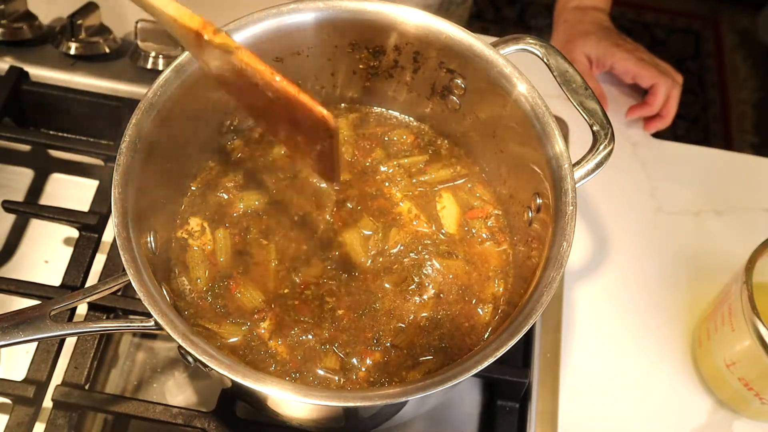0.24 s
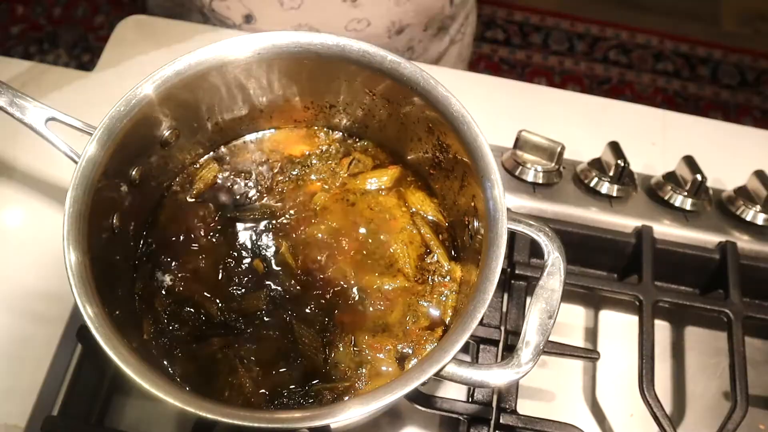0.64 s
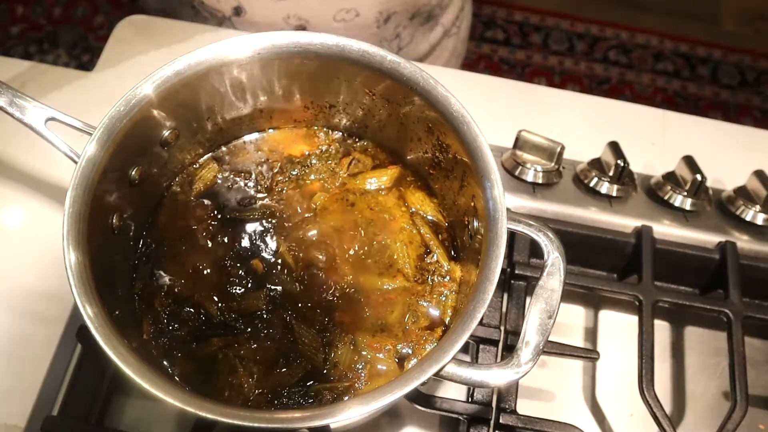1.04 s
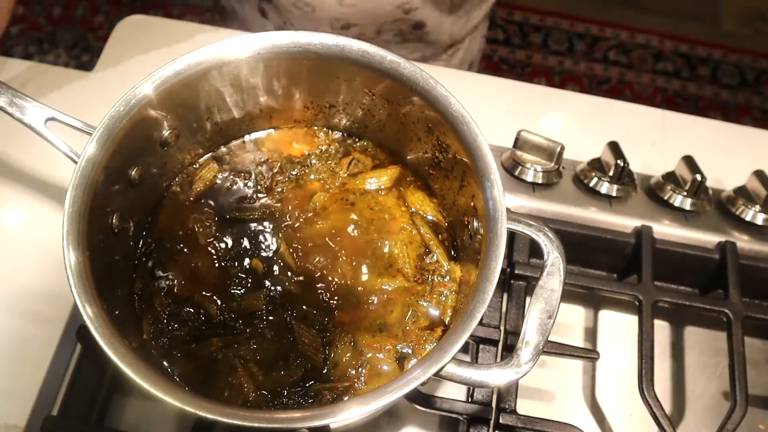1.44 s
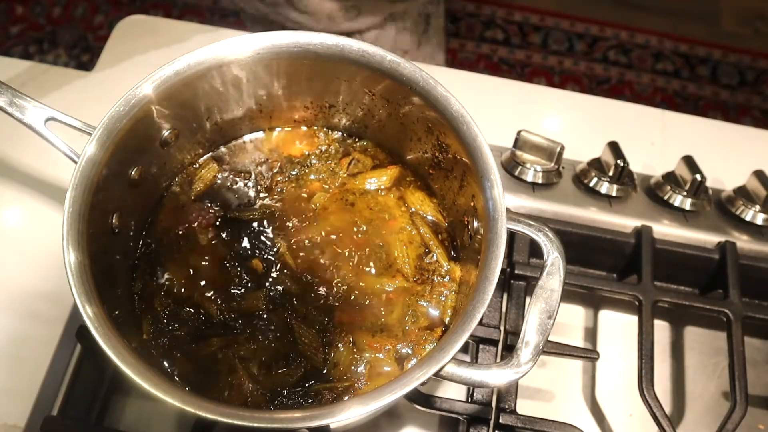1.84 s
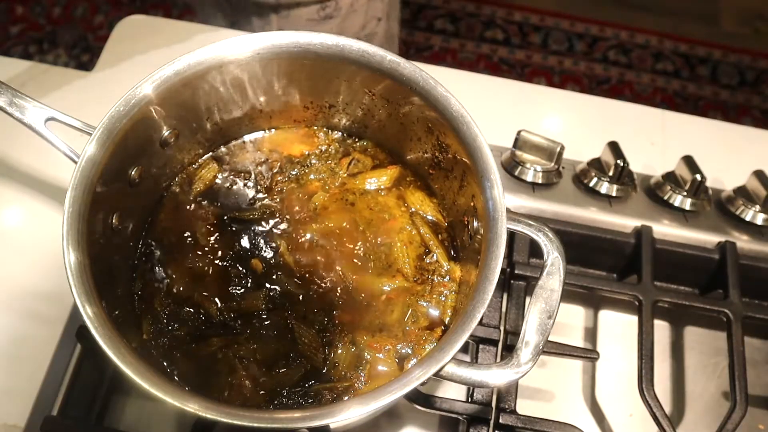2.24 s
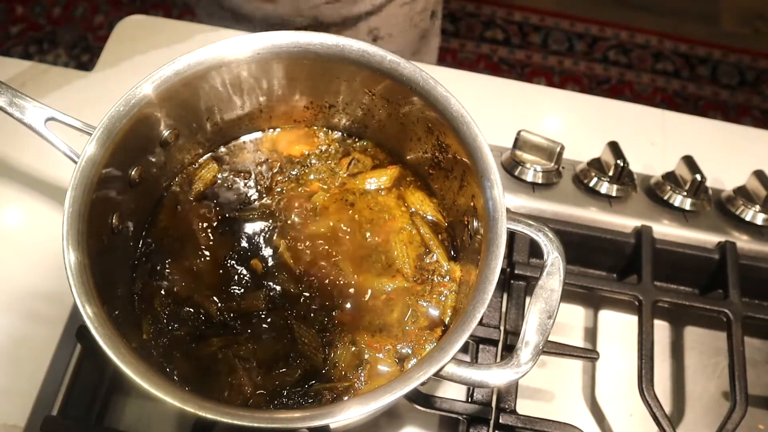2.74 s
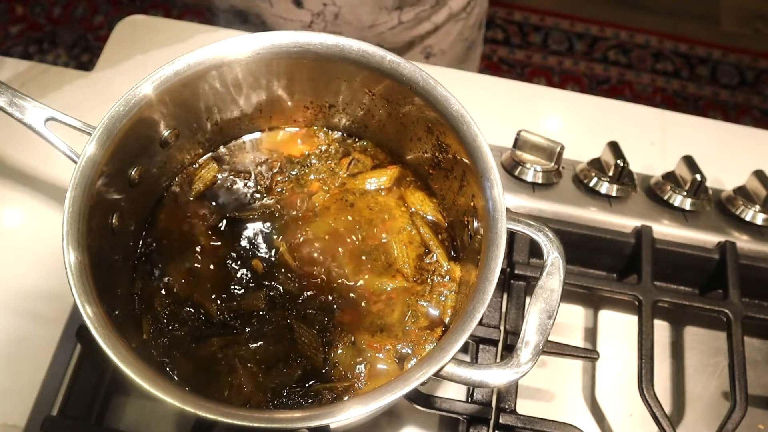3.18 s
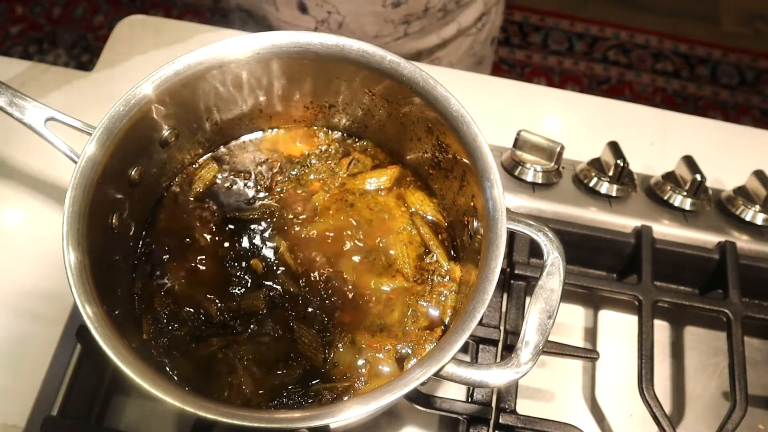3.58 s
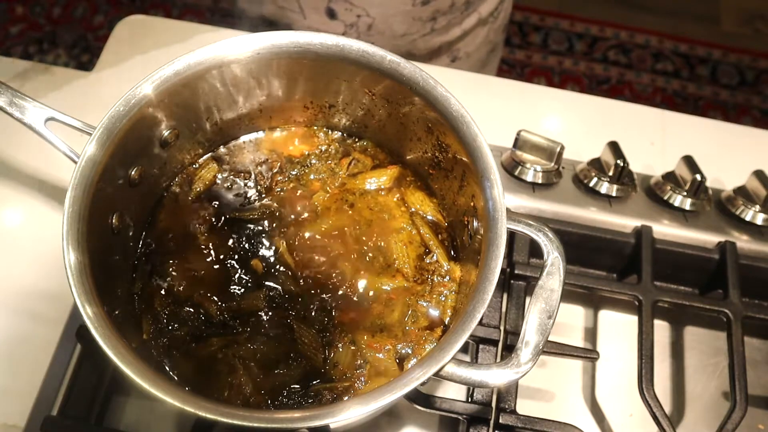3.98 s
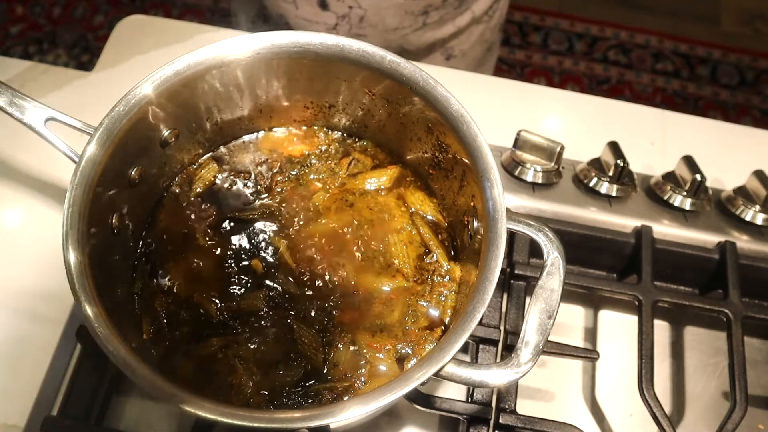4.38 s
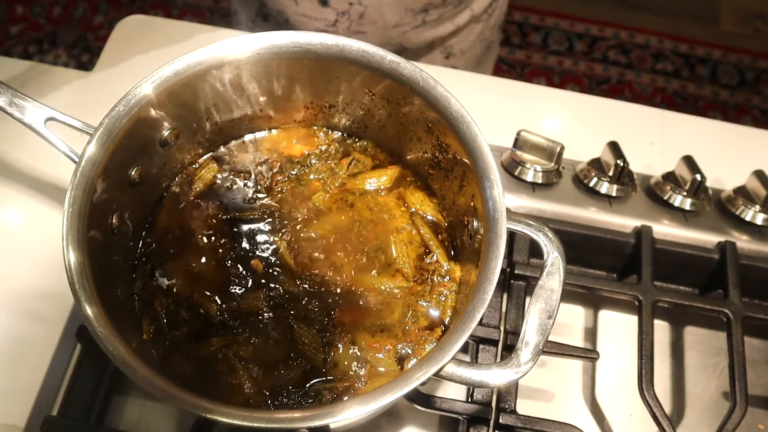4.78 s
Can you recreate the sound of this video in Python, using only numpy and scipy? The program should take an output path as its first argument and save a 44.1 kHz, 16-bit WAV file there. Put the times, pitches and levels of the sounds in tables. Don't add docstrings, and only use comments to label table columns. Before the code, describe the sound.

Quiet kitchen hush cuts to close, dense stew blips and pops in a steel pot, with wooden knocks, brief rubs and one dish set down.

```python
import sys
import numpy as np
from scipy import signal
from scipy.fft import rfft, irfft, next_fast_len
from scipy.io import wavfile
from scipy.ndimage import uniform_filter1d, map_coordinates

SR = 44100
rng = np.random.default_rng(int(sys.argv[2]) if len(sys.argv) > 2 else 0)


def ratio_of_db(decibels):
    return 10 ** (np.asarray(decibels, float) / 20)


def pcm_store(signal):
    levels = np.round(np.clip(np.atleast_2d(signal), -1, 1) * 32767)
    wavfile.write(sys.argv[1], SR, levels.astype(np.int16).T)


N = 221249

# frequency in Hz, density in dB per Hz.
FAR_HUSH = [(12, -44), (20, -26), (98, -3.5), (209, -18), (292, -12.5), (326, -13.5), (375, -16),
            (539, -19.5), (1350, -27), (2120, -29), (2650, -30), (15800, -37)]
# frequency in Hz, density in dB per Hz.
NEAR_HUSH = [(12, -46), (20, -24), (44, -6), (123, 2), (233, -0.5), (375, -9.5), (482, -6), (637, -0.5),
             (775, -13), (1280, -10), (1560, -16.5), (7860, -22.5), (15800, -26.5)]
HUSH_LEVELS_DB = [-49, -49]
# frequency in Hz, correlation from 0 to 1.
STEREO_LIKENESS = [(60, 0.89), (130, 0.86), (290, 0.45), (640, 0.29), (3000, 0.21), (9000, 0.3),
                   (15000, 0.42)]
# frequency in Hz, t60 in seconds.
KITCHEN_T60 = [(300, 0.42), (2000, 0.47), (5000, 0.32), (10000, 0.24), (16000, 0.041)]
# frequency in Hz, left over right in dB.
PORT_DIFFERENCE = [(125, -4), (500, 4.5), (4000, 2), (8000, 3.5), (13000, -1.5)]
# frequency in Hz, width in Hz, level in dB.
JINGLE_MODES = [(4500, 90, -2), (6050, 160, 2), (8000, 300, -3)]
# start in seconds, end in seconds, level in dB.
STROKES = [
    (1.24, 1.314, -43),
    (1.394, 1.535, -49.5),
    (1.72, 1.897, -46.5),
    (2.966, 3.08, -43),
    (3.066, 3.274, -55.5),
]
# frequency in Hz, density in dB per Hz.
FRICTION_COLOUR = [(900, -13), (2000, -6), (5000, -5), (8000, -11.5), (13000, -21)]
# start in seconds, peak in dB, t60 in seconds.
DISH_IMPACTS = [
    (1.2007, -36, 0.042),
    (1.2032, -7.5, 0.017),
    (1.2052, -9, 0.039),
    (1.3336, -17, 0.03),
]
# frequency in Hz, density in dB per Hz.
DISH_COLOUR = [(400, -34), (650, -15), (1500, -10), (2150, -8), (2700, -14), (3300, -1), (4100, -3),
               (4500, -10), (5600, -4), (6750, -1), (7300, -10), (9600, -13), (12000, -18), (16000, -26)]
# start in seconds, peak in dB, low, middle and high tilt in dB.
WOOD_KNOCKS = [
    (.7132, -17.5, 13.5, -2.5, -4.5),
    (3.3402, -15.5, -1, -1.5, -4),
    (4.2975, -17, -9, -1.5, -4.5),
    (4.2995, -19.5, 9, 5, -16),
]
# frequency in Hz, width in Hz, level in dB.
WOOD_MODES = [(2080, 450, -10), (3050, 520, 0), (5200, 620, -2), (6500, 900, -14), (8800, 1500, -13),
              (12000, 3000, -17)]
# start in seconds, peak in dB, low, middle and high tilt in dB.
STIFF_SNAPS = [
    (.851, -26.5, -2, -5.5, -15),
    (1.3525, -19.5, 0, -1, -18),
    (2.9825, -26, 0, 6, -6),
    (4.9258, -23.5, 5, 1.5, -8.5),
]
# start in seconds, lower mode in dB, upper mode in dB.
GRATE_HEAVES = [(0.809, -47.5, -57.5), (.908, -54, -67), (1.121, -49.5, -60), (1.267, -46.5, -69),
                (1.366, -48.5, -55.5), (1.565, -47.5, -60), (1.741, -63, -50.5), (1.85, -51, -56),
                (1.9, -45.5, -53.5), (2.071, -49, -53), (2.186, -48, -53), (2.41, -60, -52),
                (2.454, -47.5, -47), (2.541, -50.5, -56), (2.615, -48.5, -54.5), (2.699, -49.5, -55),
                (2.819, -53, -53.5), (2.959, -52, -51), (3.036, -52.5, -50), (3.22, -42.5, -54.5),
                (3.338, -75, -71), (3.413, -42, -46), (3.55, -51, -54), (3.61, -51, -59),
                (3.773, -45.5, -49.5), (3.814, -55, -52.5), (4.03, -56, -54), (4.339, -43.5, -61),
                (4.625, -54, -46.5), (4.801, -45.5, -48.5)]
# start in seconds, peak in dB, pitch in Hz.
CLEAR_DROPLETS = [(.697, -42, 7200), (0.884, -46.5, 4820), (0.9266, -43.5, 8200), (.967, -44, 5800),
                  (1.098, -46.5, 7100), (1.4964, -42, 7000), (1.5858, -45.5, 8100), (1.716, -49, 5170),
                  (1.926, -45, 6100), (2.1286, -47, 5920), (2.323, -44, 6060), (2.524, -39, 9400),
                  (2.567, -49, 4500), (2.8593, -48, 6940), (2.92, -49.5, 3720), (3.053, -44, 8500),
                  (3.201, -47, 7340), (3.446, -46.5, 8100), (3.512, -45, 2240), (3.532, -44, 3550),
                  (3.7547, -44.5, 6900), (3.8606, -47.5, 7800), (3.934, -46.5, 5300), (4.0335, -46.5, 5340),
                  (4.2, -44, 7700), (4.501, -41, 5540), (4.743, -48, 6420), (4.7626, -46, 5500),
                  (4.8172, -40, 2150), (4.952, -42.5, 6540)]
# start in seconds, peak in dB, pitch in Hz, splash in dB.
BIG_POCKETS = [(.953, -31, 507, -13), (1.108, -31, 586, -19), (1.215, -34.5, 594, -3),
               (1.261, -35.5, 630, -8), (1.745, -33, 528, -2.5), (1.874, -34, 670, -1),
               (1.886, -26.5, 830, -11), (2.046, -28, 610, -7.5), (2.088, -35, 657, -5),
               (2.104, -31.5, 580, -31), (2.175, -33.5, 560, -35), (2.264, -34, 656, -21),
               (2.428, -26, 636, -11.5), (2.443, -36, 670, 1), (2.831, -32.5, 632, 0),
               (2.969, -33, 657, -15), (3.211, -21, 590, -15), (3.417, -23, 610, -17),
               (3.697, -35, 605, 1.5), (3.78, -24, 592, -20), (3.98, -34, 620, -16), (3.994, -30, 517, -9),
               (4.323, -19.5, 692, -11), (4.489, -31.5, 510, -25), (4.617, -31.5, 614, -12),
               (4.779, -37.5, 484, -3), (4.7955, -39, 590, 2), (4.801, -26, 616, -5.5),
               (4.95, -33, 646, -26), (5.0, -33.5, 493, -43)]
# start in seconds, peak in dB, pitch in Hz.
MIDDLING_POCKETS = [(.747, -39, 555), (.792, -41, 620), (.811, -36, 636), (1.028, -39, 600),
                    (1.093, -37, 697), (1.329, -40, 600), (1.441, -40, 698), (1.533, -42.5, 666),
                    (1.769, -35.5, 610), (1.839, -38.5, 610), (2.034, -38, 620), (2.511, -40, 620),
                    (2.601, -37.5, 588), (2.684, -41, 540), (2.76, -47, 640), (2.799, -43, 600),
                    (2.952, -37, 700), (2.999, -36, 660), (3.067, -38.5, 550), (3.115, -42.5, 580),
                    (3.32, -43, 596), (3.539, -37.5, 610), (3.563, -39.5, 494), (3.856, -36.5, 600),
                    (3.868, -41, 494), (4.077, -44, 550), (4.293, -38, 643), (4.604, -42, 485),
                    (4.676, -39, 650), (4.699, -36.5, 688)]
# start in seconds, peak in dB.
SOFT_POCKETS = [(.718, -40.5), (0.881, -40.5), (.934, -40), (1.198, -41), (1.361, -45), (1.404, -43),
                (1.549, -41), (1.58, -43), (1.731, -39), (1.805, -43.5), (2.161, -47), (2.246, -40),
                (2.31, -41), (2.435, -30), (2.499, -42.5), (2.731, -41), (3.042, -43), (3.158, -44),
                (3.192, -40), (3.285, -46), (3.396, -37.5), (3.599, -43), (3.642, -40), (3.705, -36.5),
                (3.804, -43), (3.919, -47), (4.115, -45.5), (4.18, -45), (4.46, -49), (4.557, -54)]
# start in seconds, peak in dB.
WALL_RINGS = [(0.8519, -41), (1.054, -37.5), (1.3377, -40), (1.3595, -36.5), (1.448, -42), (1.672, -46),
              (1.8386, -46), (1.886, -33), (2.0368, -38.5), (2.311, -47.5), (2.424, -41), (2.6339, -39.5),
              (2.8407, -36.5), (2.9447, -50), (3.1972, -41.5), (3.3385, -47.5), (3.511, -44.5),
              (4.2963, -40), (4.409, -44.5), (4.526, -44.5), (4.6555, -46), (4.705, -45), (4.8155, -40),
              (4.843, -34), (4.9255, -45)]
# frequency in Hz, density in dB per Hz.
SPLASH_COLOUR = [(350, -11), (600, -7), (900, -5), (1400, -15), (2400, -32.5), (4000, -68)]

CHANGE_S, FADE_S, END_FADE_S = .671, .034, .001
TOP_HZ, HISS_TOP_HZ = 16500, 15950
KNOCK_T60_S, SNAP_T60_S = 0.019, 0.027
SPIT_PER_S, SPIT_DB, SPIT_SPREAD_DB, SPIT_HZ, SPIT_PITCH_SPREAD = 6, -52, 2, 5600, .25
SIMMER_PER_S, SIMMER_DB, SIMMER_SPREAD_DB = 6, -48, 3
SIMMER_HZ, SIMMER_PITCH_SPREAD, SIMMER_SPLASH_DB = 610, 0.091, -5
MIDDLING_SPLASH_DB = -4
SOFTNESS = 3.6


def unit(x):
    return x / np.sqrt(np.mean(x ** 2) + 1e-20)


def along(points, hz):
    f, v = np.transpose(points)
    return np.interp(np.log(hz + 1), np.log(f + 1), v)


def filtered(x, response):
    n = x.shape[-1]
    m = next_fast_len(n + 8192)
    spectrum = rfft(x, m) * response(np.fft.rfftfreq(m, 1 / SR))
    return irfft(spectrum, m)[..., :n]


def wobble(rate):
    knots = rng.standard_normal(int(N * rate / SR) + 4)
    return map_coordinates(knots, [np.arange(N) * rate / SR])


def place(s, grains, pan_db=0):
    first = np.round(np.asarray(s) * SR).astype(int)
    at = (first[:, None] + np.arange(grains.shape[1])).ravel()
    side = ratio_of_db(np.asarray(pan_db) / 2 + np.zeros(len(grains)))[:, None]
    return np.array([np.bincount(at, (grains * g).ravel(), N + SR)[:N] for g in (side, 1 / side)])


def resonances(modes):
    def response(f):
        total = 0
        for k, (centre, width, db) in enumerate(modes):
            damping = 1j * f * width
            total = total + (-1) ** k * ratio_of_db(db) * damping / (centre * centre - f * f + damping)
        return total
    return response


def puffs(db, colour, t60, rise):
    t = np.arange(SR // 10) / SR
    envelope = ratio_of_db(-60 * t / t60) * (1 - np.exp(-t / rise))
    rattle = rfft(rng.standard_normal((len(db), len(t))) * envelope)
    flat = rattle / np.sqrt(uniform_filter1d(np.abs(rattle) ** 2, size=50, axis=1) + 1e-12)
    burst = filtered(irfft(flat, len(t)) * (t < .08), colour)
    return ratio_of_db(db)[:, None] * burst / np.abs(burst).max(axis=1, keepdims=True)


def stray(per_s, db, spread_db, hz, pitch_spread):
    slots = np.arange(CHANGE_S + FADE_S, N / SR, 1 / per_s)
    luck = rng.standard_normal((len(slots), 2))
    times = slots + rng.random(len(slots)) / per_s
    return times, db + spread_db * luck[:, 0], hz * np.exp(pitch_spread * luck[:, 1])


def kitchen(x, wet_db):
    hz, t, z = signal.stft(rng.standard_normal((2, SR // 2)), SR, nperseg=256)
    decay = ratio_of_db(-60 * t / along(KITCHEN_T60, hz)[:, None])
    tail = signal.istft(z * decay, SR, nperseg=256)[1]
    late = np.pad(x.mean(axis=0), (130, 0))[None]
    return x + ratio_of_db(wet_db) * signal.fftconvolve(late, tail / np.linalg.norm(tail[0]), axes=1)[:, :N]


def rush(spectrum):
    def mid_side(hz):
        turn = np.arccos(np.clip(along(STEREO_LIKENESS, hz), -1, 1)) / 2
        return ratio_of_db(along(spectrum, hz)) * (hz < HISS_TOP_HZ) * [np.cos(turn), np.sin(turn)]
    mid, side = filtered(rng.standard_normal((2, N)), mid_side)
    return unit(np.array([mid + side, mid - side]))


def jingle():
    t = np.arange(N) / SR
    shake = np.clip(2 - np.abs(t - .52) / .03, 0, 1) * ratio_of_db(-62 + 2.5 * wobble(60))
    tick = place([.511], puffs([-48], resonances(JINGLE_MODES), t60=.015, rise=.0003))
    return shake * unit(filtered(rng.standard_normal((2, N)), resonances(JINGLE_MODES))) + tick


def slides():
    t = np.arange(N) / SR
    stroke = 0
    for start, end, db in STROKES:
        onset = np.clip((t - start) / 0.025, 0, 1)
        slowing = np.clip((end - t) / (end - start), 0, 1)
        stroke = stroke + ratio_of_db(db) * onset * slowing
    return stroke * ratio_of_db(0.83 * wobble(150)) * rush([(500, -120)] + FRICTION_COLOUR)


def dish():
    body = lambda f: ratio_of_db(along(DISH_COLOUR, f))
    clacks = sum(place([s], puffs([db], body, t60, rise=.0005)) for s, db, t60 in DISH_IMPACTS)
    return kitchen(clacks, wet_db=-8)


def blows(rows, body, t60, wet_db):
    out = 0
    for s, db, low_db, mid_db, high_db in rows:
        tilt = [(1600, low_db), (3200, 0), (5300, mid_db), (9000, high_db)]
        colour = lambda f: ratio_of_db(along(tilt, f)) * body(f)
        out = out + kitchen(place([s], puffs([db], colour, t60, rise=0.000083)), wet_db)
    return out


def knocks():
    wood = blows(WOOD_KNOCKS, resonances(WOOD_MODES), KNOCK_T60_S, wet_db=-10.0)
    return wood + blows(STIFF_SNAPS, resonances([(3500, 16000, 0)]), SNAP_T60_S, wet_db=-9)


def grate():
    t, out = np.arange(SR // 4) / SR, 0
    swell = t / 0.026 * np.exp(1 - t / 0.022)
    s, *levels = np.transpose(GRATE_HEAVES)
    for db, hz in zip(levels, (124, 234)):
        pitch = hz * (1 + 0.033 * rng.standard_normal((len(s), 1)))
        out = out + place(s - .005, ratio_of_db(db + 4.5)[:, None] * swell * np.sin(2 * np.pi * pitch * t))
    return out


def droplets():
    chance = stray(SPIT_PER_S, SPIT_DB, SPIT_SPREAD_DB, SPIT_HZ, SPIT_PITCH_SPREAD)
    s, db, hz = np.hstack([np.transpose(CLEAR_DROPLETS), chance])
    centre = hz[:, None]
    colour = lambda f: (f > 1200) / (1 + ((f - centre) / (0.27 * centre)) ** 4)
    snaps = puffs(db + 6, colour, t60=0.015, rise=0.000067)
    return kitchen(place(s, snaps, rng.normal(-1.3, 3.3, len(s))), wet_db=-10)


def pockets():
    soft = [(s, db, SIMMER_HZ * np.exp(SIMMER_PITCH_SPREAD * rng.standard_normal()))
            for s, db in SOFT_POCKETS]
    faint = np.transpose(stray(SIMMER_PER_S, SIMMER_DB, SIMMER_SPREAD_DB, SIMMER_HZ, SIMMER_PITCH_SPREAD))
    middling = [(*p, MIDDLING_SPLASH_DB) for p in MIDDLING_POCKETS]
    simmer = [(*p, SIMMER_SPLASH_DB) for p in soft + list(faint)]
    return np.transpose(BIG_POCKETS + middling + simmer)


def bubbles(db, hz, cycles, climb, swell):
    turns = np.arange(SR // 40) / SR * hz[:, None]
    u = turns / cycles
    shape = (u / swell * np.exp(1 - u / swell)) ** SOFTNESS
    return ratio_of_db(db)[:, None] * shape * np.sin(2 * np.pi * turns * (1 - climb / 2 + climb * u / 2))


def pot_wall():
    s, db = np.transpose(WALL_RINGS)
    t = np.arange(SR // 16) / SR
    hz = 1275 + 25 * rng.standard_normal((len(s), 1))
    envelope = ratio_of_db(db[:, None] + 8 - 60 * t / 0.039) * (1 - np.exp(-t / 0.0019))
    ring = envelope * np.sin(2 * np.pi * hz * t)
    slap = puffs(db - 3.0, resonances([(1510, 470, 0)]), t60=0.011, rise=0.00011)
    return place(s, slap) + place(s - .001, ring)


def boil():
    s, db, hz, splash_db = pockets()
    blips = bubbles(db + .5, hz, cycles=5.03, climb=0.12, swell=0.48)
    big = place(s - .002, blips, rng.normal(0, 1.2, len(s)))
    colour = lambda f: ratio_of_db(along(SPLASH_COLOUR, f))
    splash = place(s, puffs(db + splash_db + 4.0, colour, t60=.03, rise=.001))
    luck = rng.random((800, 6))
    small_s = s[(luck[:, 0] * len(s)).astype(int)] + 0.062 * (luck[:, 5] - .35)
    small_hz = 630 * np.exp(0.47 * (luck[:, 1] + luck[:, 2] - 1))
    small_db = -52 + 13 * luck[:, 3] ** 2
    small_blips = bubbles(small_db, small_hz, cycles=2.5, climb=0.17, swell=0.6)
    small = place(small_s, small_blips, 4 * luck[:, 4] - 2)
    return kitchen(big + splash + small + pot_wall(), wet_db=-17.0)


def ports(x):
    sign = np.array([[1], [-1]])

    def response(hz):
        advance = np.exp(2j * np.pi * hz * sign * 14e-6)
        return ratio_of_db(sign * along(PORT_DIFFERENCE, hz) / 2) * advance
    return filtered(x, response)


def scene():
    far = ratio_of_db(HUSH_LEVELS_DB[0]) * rush(FAR_HUSH) + jingle()
    near = ratio_of_db(HUSH_LEVELS_DB[1]) * rush(NEAR_HUSH) + grate() + slides()
    near = near + ports(boil() + droplets() + knocks() + dish())
    return np.where(np.arange(N) < CHANGE_S * SR, far, near)


def low_pass(x):
    return signal.sosfilt(signal.butter(12, 16820, fs=SR, output="sos"), x)


def record(dry):
    t = np.arange(N) / SR
    dip = np.clip(np.abs(t - CHANGE_S) / FADE_S, .07, 1) ** 1.4
    fade = dip * np.clip((t[-1] - t) / END_FADE_S, 0, 1)
    return low_pass(filtered(dry, lambda hz: hz < TOP_HZ) * fade)


dry = scene()
out = record(dry)
pcm_store(out)
```